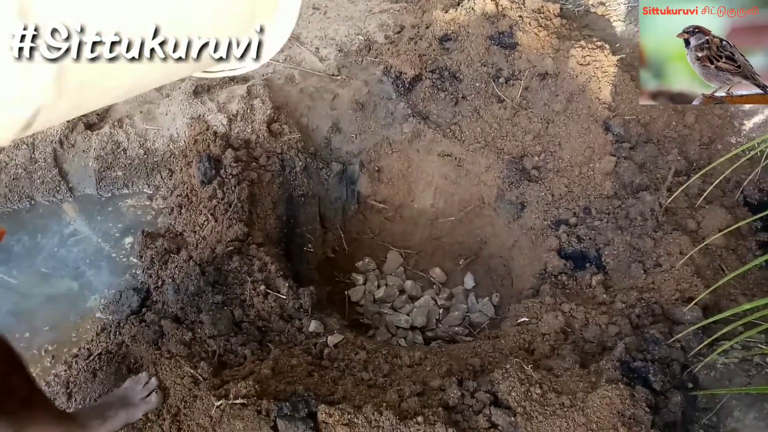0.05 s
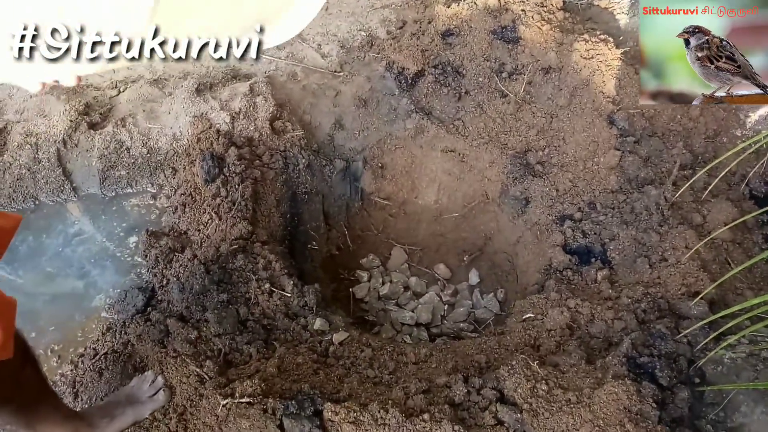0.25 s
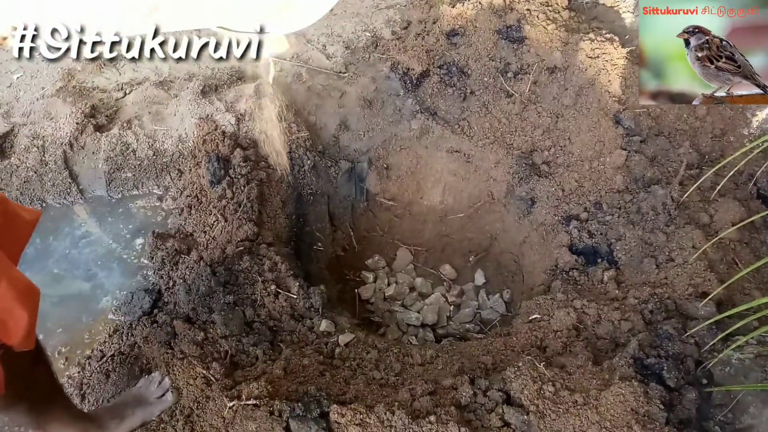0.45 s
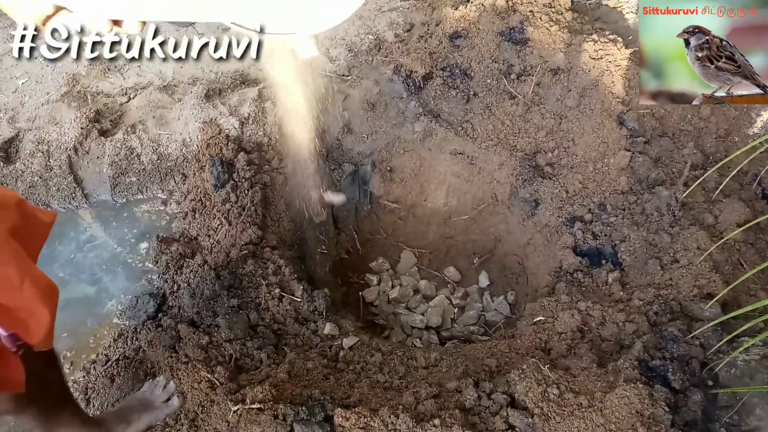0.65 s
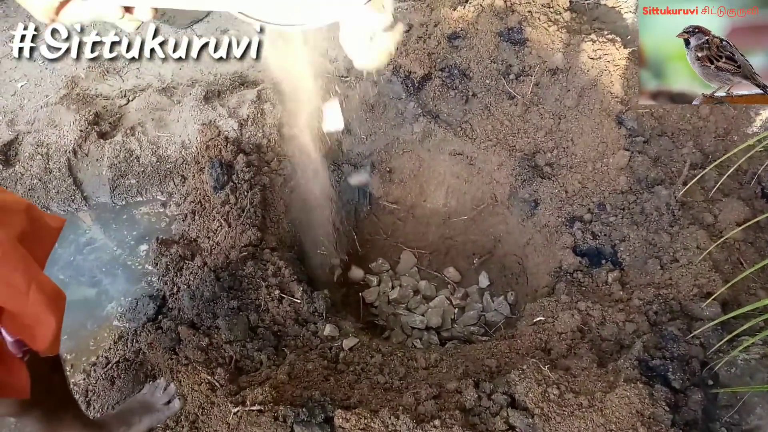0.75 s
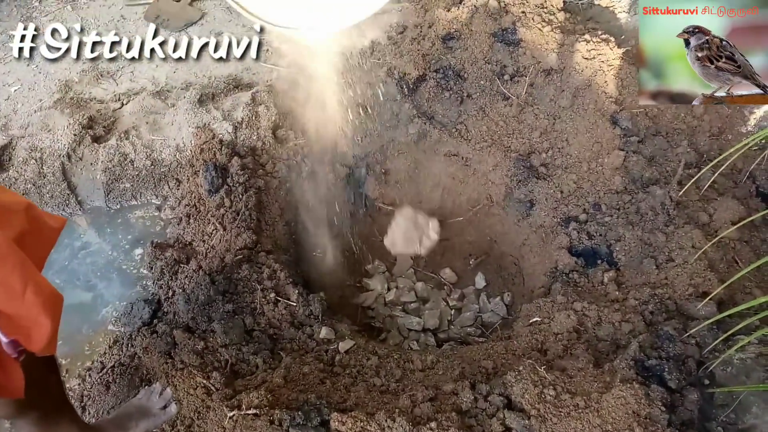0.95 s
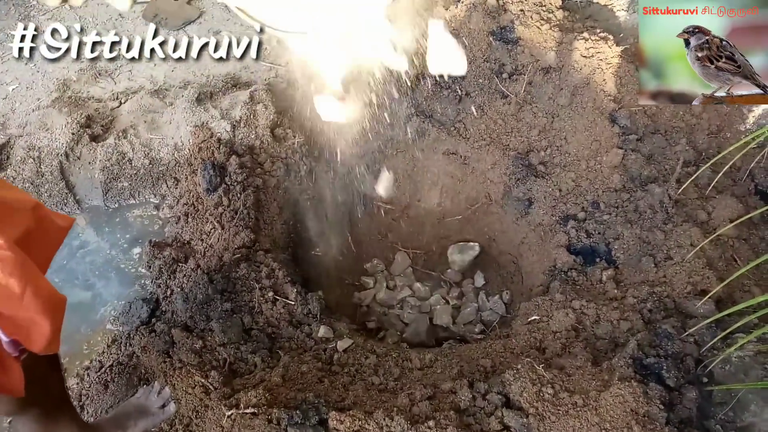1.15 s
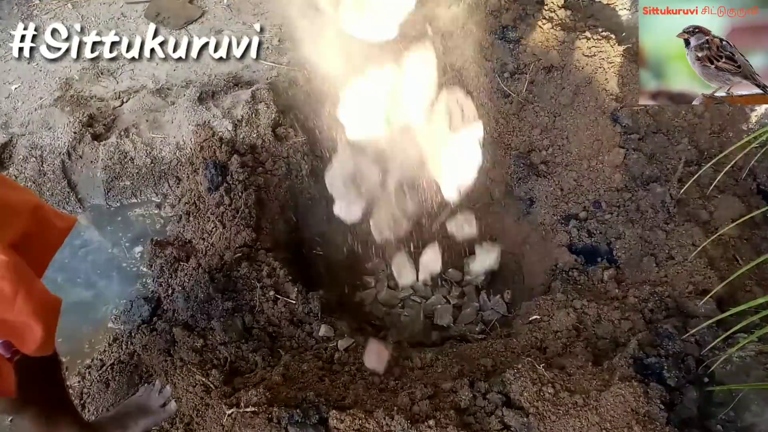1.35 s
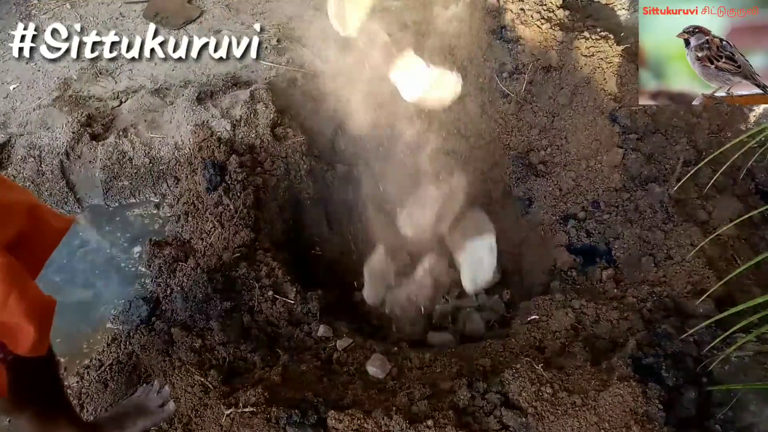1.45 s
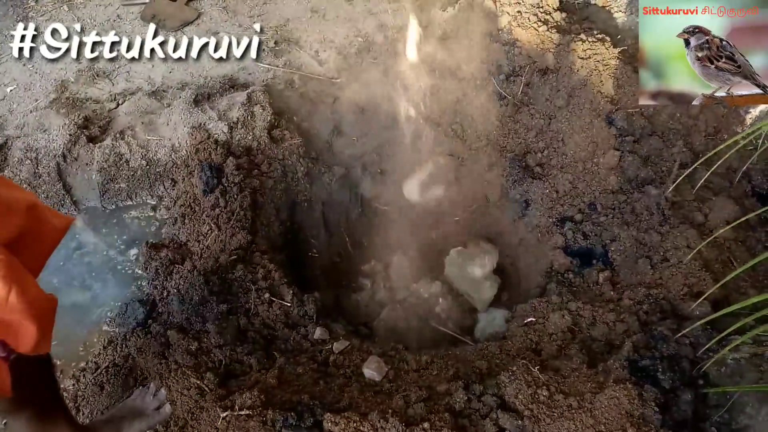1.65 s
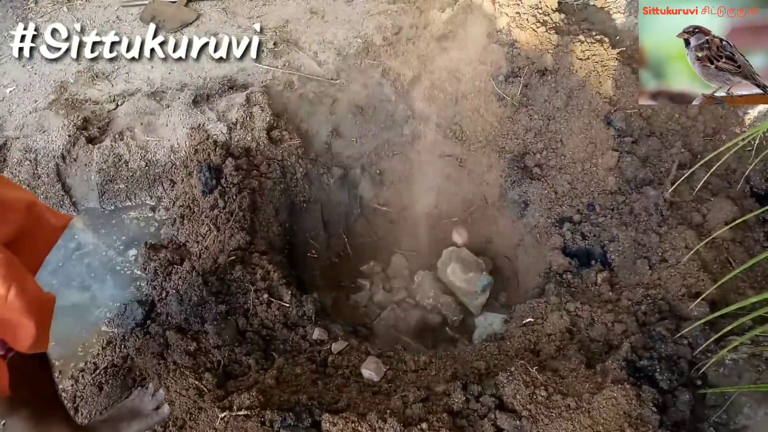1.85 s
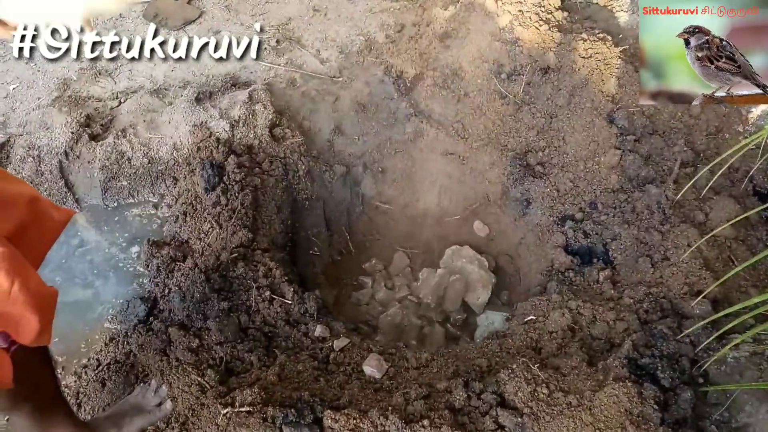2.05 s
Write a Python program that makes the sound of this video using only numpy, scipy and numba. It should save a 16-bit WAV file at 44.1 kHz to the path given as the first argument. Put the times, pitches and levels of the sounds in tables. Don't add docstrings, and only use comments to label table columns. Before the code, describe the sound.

Stones clatter from a plastic tub into an earth pit outdoors, close to a phone microphone. Faint knocks and a low thud open; from 0.2 s stones pour, crashing densely with hollow tub booms, gritty hiss and sharp cracks, easing briefly around 0.8 s. After 1.4 s the pour thins; a firm knock lands at 1.8 s, then small knocks settle until 2 s over quiet air.

```python
import sys
import numpy as np
from scipy import signal
from scipy.fft import rfft, irfft
from scipy.io import wavfile
from scipy.ndimage import uniform_filter1d
from numba import njit

SR = 44100
rng = np.random.default_rng(int(sys.argv[2]) if len(sys.argv) > 2 else 0)


def store_pcm(level_fs):
    pcm = np.round(np.clip(level_fs, -1, 1) * 32767).astype(np.int16)
    wavfile.write(sys.argv[1], SR, np.atleast_2d(pcm).T)


def linear_from_db(decibels):
    return 10 ** (np.asarray(decibels, float) / 20)


N = 92610
STEP = 16
TOP_HZ = 16000

# (frequency [Hz], level [dB])
AIR_COLOUR = [(15, -51), (40, 8), (236, 2.5), (1440, 0.5), (2110, -43), (9840, -39), (16000, -59)]
AIR_DB, INSECT_HZ, INSECT_DB = -52.5, 8260, -78

# (time [s], clatter level [dB], grit level [dB])
STONE_FLOW = [(0, -48.5, -64.5), (.19, -45.5, -62.5), (.22, -27.5, -49), (.32, -29, -51), (.46, -24, -35),
              (.76, -20, -40.5), (.79, -28.5, -50), (.88, -29.5, -47.5), (.9, -24, -35.5), (1.2, -21, -32),
              (1.4, -21.5, -43), (1.46, -39, -36), (1.55, -34, -37), (1.575, -46, -56), (1.66, -47, -42.5),
              (1.72, -45, -40), (1.77, -62, -57.5), (2.1, -53.5, -69)]
# (time [s], peak [dB], pitch
# [Hz], rattle t60 [s])
POUR_CRASHES = [(0.208, -15, 1196, 0.028), (0.317, -7.5, 298, 0.13), (0.332, -2.5, 1203, 0.25),
                (0.405, 1.5, 1390, 0.059), (0.423, -0.5, 1265, 0.051), (0.468, -3, 1760, 0.27),
                (0.491, -2.5, 1770, 0.21), (0.52, 0, 1570, 0.09), (0.534, -2, 692, 0.084),
                (0.565, -8, 1230, 0.36), (0.593, -3, 1980, 0.096), (0.607, -1, 1350, 0.3),
                (0.64, -8, 1250, 0.23), (0.672, -5.5, 1800, 0.15), (0.698, -6, 1223, 0.065),
                (0.727, -3.5, 385, 0.014), (0.82, -14.5, 696, 0.27), (0.8945, -2, 363, 0.2),
                (0.957, -5, 2030, 0.17), (0.988, -5, 1600, 0.4), (1.004, -1, 695, 0.029),
                (1.049, -4.5, 1560, 0.19), (1.076, -3, 1390, 0.22), (1.113, 0, 512, 0.26),
                (1.148, 1.5, 1384, 0.16), (1.199, -4, 813, 0.7), (1.261, -3, 1310, 0.25)]
MORE_CRASHES = [(1.33, -4.5, 1245, 0.033), (1.344, -7, 2050, 0.14), (1.378, -2.5, 1310, 0.36),
                (1.431, -6, 1370, 0.056), (1.464, -14, 1270, 0.37), (1.518, -4.5, 1300, 0.053),
                (1.539, -4.5, 1266, 0.05), (1.644, -10, 463, 0.052), (1.68, -7, 1050, 0.05),
                (1.699, -8.5, 750, 0.092), (1.242, -8, 1330, 0.11), (1.48, -12, 1500, 0.18),
                (1.502, -10.5, 1400, 0.16), (1.549, -16, 1310, 0.058), (1.527, -9.5, 2080, 0.17),
                (1.444, -9, 1520, 0.073), (.232, -19, 910, 0.045), (0.296, -19, 1120, 0.046),
                (1.622, -32, 1070, 0.043), (1.646, -9.5, 1475, 0.028), (1.691, -12, 1370, 0.056)]
# (frequency [Hz], level [dB])
STONE_COLOUR = [(150, -13.5), (235, -8.5), (400, -3.5), (700, -5.5), (1300, -1.5), (2250, -4.5),
                (2800, -68), (4200, -25.5)]
# (pitch [Hz], level [dB], t60 [s])
TUB_RINGS = [(237, 4.5, 0.29), (726, -5.5, 0.031), (1201, -6.5, 0.066), (1390, -3.5, 0.35)]
STONE_CYCLES, STONE_SCATTER_DB = 16.4, 2.5
RATTLE_DB, RATTLE_RISE_S = -11.5, 0.0023
LEAD_DB, CONTACT_S = -3, 0.001

# (time [s], peak [dB], t60 [s])
POUR_CRACKS = [(0.3161, -22, 0.11), (0.3331, -13.5, 0.058), (0.4243, -37, 0.049), (0.4405, -18, 0.039),
               (0.4663, -14.5, 0.19), (0.517, -38, 0.04), (0.5341, -16.5, 0.086), (0.591, -12.5, 0.074),
               (0.639, -14, 0.066), (0.6747, -20, 0.037), (0.7006, -20, 0.025), (0.751, -19.5, 0.032),
               (0.773, -18, 0.026), (0.8908, -18, 0.014), (0.9416, -16.5, 0.031), (0.986, -11.5, 0.024),
               (1.052, -15, 0.048), (1.145, -20, 0.091), (1.3456, -11.5, 0.051), (1.4643, -23, 0.044),
               (0.286, -30.5, 0.056), (0.406, -38, 0.032), (0.5705, -21, 0.044), (0.853, -40, 0.032),
               (1.08, -20, .06), (1.2045, -18, 0.15), (1.243, -18, 0.12), (1.277, -17, 0.069),
               (1.326, -17, 0.025), (1.38, -23.5, 0.094), (1.518, -26, 0.045)]
# (time [s], peak [dB])
PIT_CRACKS = [(1.5872, -14.5), (1.6354, -23.5), (1.65, -38), (1.664, -20.5), (1.704, -20), (1.8217, -32.5),
              (1.836, -33), (1.8631, -38), (1.902, -28), (1.924, -39), (2.0147, -37), (2.0322, -31.5)]
# (frequency [Hz], level [dB])
GRIT_COLOUR = [(1470, -11), (2500, 3), (3950, -10.5), (9660, -22.5), (12600, -33), (14900, -37),
               (16000, -66)]
GRIT_CYCLES, GRIT_SCATTER_DB, CLUMP_DB, DUST_DB = 6.9, 3.5, 1.5, -17
CRACK_DB, CRACK_RISE_S, PIT_CRACK_T60_S, TICK_DB = -3.5, 0.0015, 0.03, -9
PIT_FROM_S, PIT_DULL_HZ = 1.4, 9600

# (time [s], peak [dB], pitch [Hz], t60 [s])
PEBBLES = [
    (.005, -55, 3300, .06),
    (.213, -44, 4500, .05),
    (1.829, -45, 3650, 0.061),
    (1.838, -48, 3620, 0.05),
]
# (time [s], peak [dB], centre pitch [Hz], t60 [s])
FLAKES = [(.047, -45.5, 4500, 0.022), (.317, -23.5, 9000, 0.014), (.891, -17.5, 6700, 0.012),
          (.9425, -12, 5900, 0.012), (1.002, -27, 11000, .015), (1.052, -29, 5200, 0.028),
          (1.149, -22, 7000, 0.039), (1.262, -17, 5400, 0.025), (1.43, -17, 6460, 0.062),
          (1.466, -20.5, 4750, 0.035), (1.493, -23, 7250, .015), (1.54, -23, 5000, 0.022),
          (1.5874, -8.5, 3500, .03), (1.5915, -12, 4000, 0.027), (1.651, -18.5, 3760, .02),
          (1.668, -27, 3400, 0.011), (1.8215, -36, 3300, 0.011), (1.9025, -25.5, 2990, 0.024),
          (2.033, -29.5, 3450, 0.026), (.336, -20, 2510, 0.044), (.699, -19, 8400, 0.008),
          (.495, -24, 4000, .05)]
CHIP_OCTAVES, CHIP_DB, CHIP_CYCLES = 0.3, -7.5, 16.8

# (time [s], peak [dB])
EARTH_THUDS = [(0.4, -21.5), (0.55, -20), (0.664, -22), (1.191, -31), (1.318, -24), (1.707, -27.5),
               (.037, -34), (.084, -35), (.13, -32), (.308, -31.5), (1.76, -36), (1.826, -40), (2.012, -42)]
# (time [s], peak [dB], pitch [Hz], t60 [s])
HOLLOW_BOOMS = [(0.048, -17.5, 290, 0.033), (.061, -30.5, 398, 0.081), (0.362, 0.5, 292, 0.041),
                (0.552, -7.5, 237, 0.071), (0.821, -15, 222, 0.14), (0.902, -13, 304, 0.1),
                (1.005, -13.5, 245, 0.25), (1.081, -10, 200, 0.076), (1.112, -17, 236, 0.19),
                (1.189, -13.5, 217, 0.14), (1.284, -14, 233.3, 0.24), (1.345, -7, 237, 0.17),
                (1.64, -21, 163, 0.06)]
BOOM_RISE_S, THUD_HZ, THUD_T60_S = 0.0016, 106.4, 0.061

# (time [s], peak [dB], pitch [Hz], t60 [s])
SINGLE_KNOCKS = [(.0455, -23, 1240, 0.031), (.05, -25.5, 634, 0.072), (.82, -14.5, 750, 0.033),
                 (1.0795, -4, 1630, .02), (1.4655, -9, 1340, 0.033), (1.6805, -5.5, 1150, 0.018),
                 (.12, -27, 535, 0.026), (.147, -25, 580, 0.043), (.164, -31, 505, 0.27),
                 (.253, -10, 365, 0.19), (.8925, -9, 1290, 0.023), (1.5872, -7, 1530, 0.015),
                 (1.5915, -7.5, 1450, 0.012), (1.6375, -13, 1380, 0.034), (1.6665, -11.5, 1340, 0.015),
                 (1.7395, -9.5, 1104, 0.007), (1.7465, -12, 524, 0.059), (1.755, -18.5, 675, 0.061),
                 (1.7945, -26.5, 1130, 0.015), (1.8225, -2.5, 687, 0.0228), (1.902, -19, 940, 0.051),
                 (1.9795, -17, 840, 0.032), (2.0137, -19, 1430, 0.021), (2.033, -17.5, 1140, 0.025)]
BLOW_CYCLES, BLOW_RISE_CYCLES, PAIR_DB = 6.05, 0.64, -13.5
BODY_LOW_HZ, BODY_HIGH_HZ, BODY_DB = 345.7, 1846, -10.5

ECHO_DB, ECHO_T60_S = -14, 0.092
LOW_CUT_HZ, LIMIT = 55, 0.66


def table(rows):
    return np.array(rows, float).T


def colour(points, hz):
    f, db = table(points)
    return linear_from_db(np.interp(np.log(hz), np.log(f), db))


def unit(x):
    return x / np.sqrt(np.mean(x ** 2))


@njit
def ring(n, start, turn, fade, rise, size):
    y = np.zeros(n)
    for k in range(len(start)):
        swing = size[k] + 0j
        spin = fade[k] * np.exp(1j * turn[k])
        softness, left, i = 1., 1., start[k]
        while i < n and left > .002:
            y[i] += swing.imag * (1 - softness) ** 2
            swing *= spin
            softness *= rise[k]
            left *= fade[k]
            i += 1
    return y


def rings(s, hz, t60, rise_s, size):
    each = np.ones(len(s))
    start = np.clip(s * SR, 0, N).astype(np.int64)
    turn = each * 2 * np.pi * hz / SR
    fade = each * np.exp(-np.log(1000) / (np.maximum(t60, .003) * SR))
    rise = each * np.exp(-1 / (rise_s * SR))
    return ring(N, start, turn, fade, rise, each * size)


def bursts(s, db, t60, rise_s):
    since = np.maximum(np.arange(0, N, STEP)[None] / SR - s[:, None], 0)
    rise = 1 - np.exp(-since / rise_s)
    fade = np.exp(-2 * np.log(1000) * since / np.maximum(t60, .01)[:, None])
    return np.sum(linear_from_db(db)[:, None] ** 2 * rise * fade, axis=0)


def grains(power, points, cycles, scatter_db, count, size):
    pitch, sign = rng.random((count * size, 2)).T
    when, force = np.repeat(rng.random((count, 2)), size, axis=0).T
    lo, hi = points[0][0], points[-1][0]
    s = when * N / SR
    hz = lo * (hi / lo) ** pitch
    scatter = linear_from_db(scatter_db * np.minimum(-np.log(1 - force), 3.))
    gain = colour(points, hz) * hz * scatter * np.sign(sign - .5)
    energy = np.sum(gain ** 2 * cycles / hz / (4 * np.log(1000)))
    gain = gain / np.sqrt(energy * SR / N)
    activity = np.sqrt(power[(s * SR).astype(int) // STEP])
    return rings(s, hz, cycles / hz, 0.28 / hz, gain * activity)


def air():
    hz = np.maximum(np.arange(N // 2 + 1) * SR / N, 1)
    noise = rfft(rng.standard_normal((2, N)))
    background = unit(irfft(noise[0] * colour(AIR_COLOUR, hz), N))
    insects = unit(irfft(noise[1] * np.exp(-((hz - INSECT_HZ) / 500) ** 2), N))
    return linear_from_db(AIR_DB) * background + linear_from_db(INSECT_DB - 2.5 * np.arange(N) / SR) * insects


def flow(column):
    columns = table(STONE_FLOW)
    return linear_from_db(np.interp(np.arange(0, N, STEP) / SR, columns[0], columns[column])) ** 2


def clatter():
    s, peak_db, hz, t60 = table(POUR_CRASHES + MORE_CRASHES)
    crash = bursts(s, peak_db + RATTLE_DB, t60, RATTLE_RISE_S)
    x = grains(flow(1) + crash, STONE_COLOUR, STONE_CYCLES, STONE_SCATTER_DB, count=3000, size=5)
    for tub_hz, tub_db, tub_t60 in TUB_RINGS:
        r = np.exp(-np.log(1000) / (tub_t60 * SR))
        poles = [1, -2 * r * np.cos(2 * np.pi * tub_hz / SR), r * r]
        x = x + linear_from_db(tub_db) * signal.lfilter([1 - r * r, 0, r * r - 1], poles, x)
    blows = rings(s, hz, 0.026, CONTACT_S, linear_from_db(peak_db + LEAD_DB))
    return x + blows + grit(crash)


def grit(crash):
    pit_cracks = [tuple(row) + (PIT_CRACK_T60_S,) for row in PIT_CRACKS]
    s, peak_db, t60 = table(POUR_CRACKS + pit_cracks)
    held = np.repeat(rng.standard_normal(len(crash) // 14 + 1), 14)
    clumps = uniform_filter1d(held, size=6)[:len(crash)]
    sand = (flow(2) + linear_from_db(DUST_DB) ** 2 * crash) * linear_from_db(2 * CLUMP_DB * clumps)
    power = sand + bursts(s, peak_db + CRACK_DB, t60, CRACK_RISE_S)
    x = grains(power, GRIT_COLOUR, GRIT_CYCLES, GRIT_SCATTER_DB, count=13000, size=3)
    x = x + rings(s, rng.uniform(1700, 6300, len(s)), 0.0062, .0001, linear_from_db(peak_db + TICK_DB))
    dull = signal.sosfilt(signal.butter(2, PIT_DULL_HZ, fs=SR, output="sos"), x)
    return np.where(np.arange(N) / SR < PIT_FROM_S, x, dull)


def chips():
    s, db, hz, t60 = table(PEBBLES)
    pebbles = rings(s, hz, t60, 0.0009, linear_from_db(db))
    s, db, hz, t60 = np.repeat(table(FLAKES), 40, axis=1)
    pitch = rng.standard_normal(len(s))
    late = rng.random(len(s)) ** 2
    f = np.minimum(hz * 2 ** (CHIP_OCTAVES * pitch), TOP_HZ)
    flakes = rings(s + late * t60 / 2, f, CHIP_CYCLES / f, .5 / f, linear_from_db(db + CHIP_DB - 24 * late))
    return pebbles + flakes


def booms():
    s, db = table(EARTH_THUDS)
    thud_hz = THUD_HZ * (1 + 0.23 * rng.standard_normal(len(s)))
    thuds = rings(s, thud_hz, THUD_T60_S, 0.003, 0.9 * linear_from_db(db))
    s, db, hz, t60 = table(HOLLOW_BOOMS)
    return thuds + rings(s, hz, t60, BOOM_RISE_S, 0.79 * linear_from_db(db))


def knocks():
    s, db, hz, t60 = table(SINGLE_KNOCKS)
    x = rings(s, hz, BLOW_CYCLES / hz, BLOW_RISE_CYCLES / hz, 3.34 * linear_from_db(db))
    x = x + rings(s, 0.79 * hz, t60, 0.00075, linear_from_db(db + PAIR_DB))
    x = x + rings(s, 1.05 * hz, 0.37 * t60, 0.00019, linear_from_db(db + PAIR_DB))
    u = rng.random((len(s), 10)).T
    for k in range(10):
        f = BODY_LOW_HZ * (BODY_HIGH_HZ / BODY_LOW_HZ) ** ((k + u[k]) / 10)
        size = linear_from_db(db + BODY_DB) * np.minimum(1.18 * hz / f, 1) ** 2
        x = x + (-1) ** k * rings(s, f, 0.69 * t60, 0.000083, size)
    return signal.sosfilt(signal.butter(2, 300, "high", fs=SR, output="sos"), x)


def pit_echo(near):
    t = np.arange(SR // 5) / SR
    walls = rng.standard_normal(len(t)) * np.exp(-np.log(1000) * t / ECHO_T60_S) * (t > .002)
    walls = walls / np.sqrt(np.sum(walls ** 2))
    return linear_from_db(ECHO_DB) * signal.fftconvolve(near, walls)[:N]


def scene():
    near = clatter() + knocks() + booms() + chips()
    return (near + pit_echo(near) + air())[None]


def roll_off(x):
    return signal.sosfilt(signal.butter(12, 16480, fs=SR, output="sos"), x)


def record(dry):
    x = signal.sosfilt(signal.butter(3, LOW_CUT_HZ, "high", fs=SR, output="sos"), dry)
    x = x / (1 + (x / LIMIT) ** 6) ** (1 / 6)
    x = signal.sosfilt(signal.cheby2(8, 45, TOP_HZ * 1.04, fs=SR, output="sos"), x)
    return roll_off(x)


dry = scene()
out = record(dry)
store_pcm(out)
```